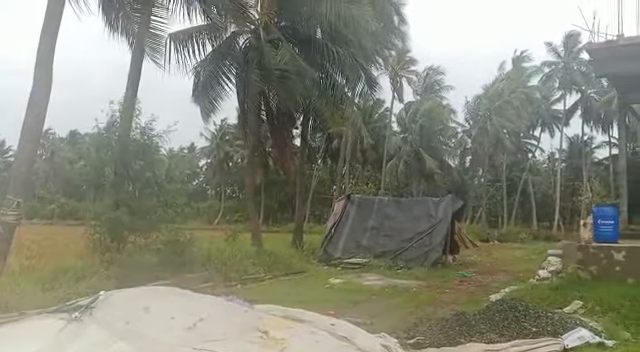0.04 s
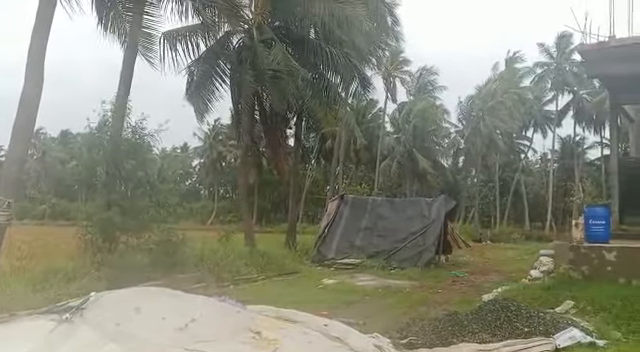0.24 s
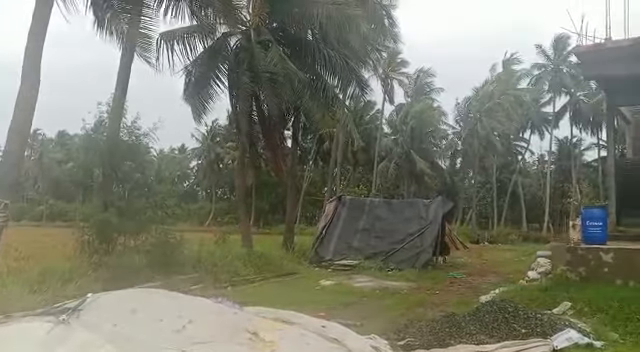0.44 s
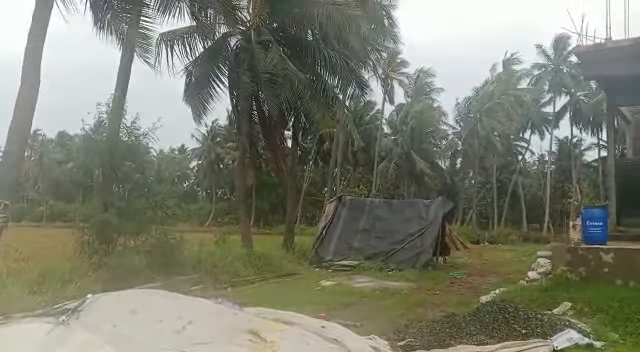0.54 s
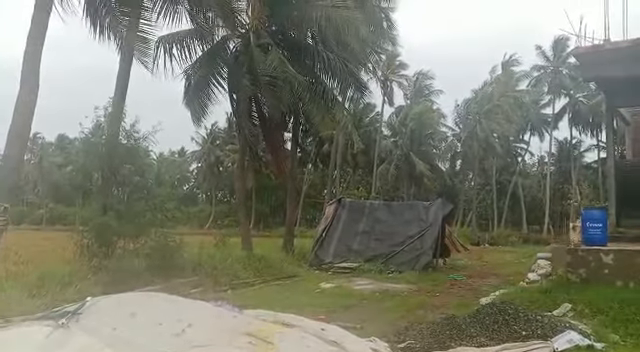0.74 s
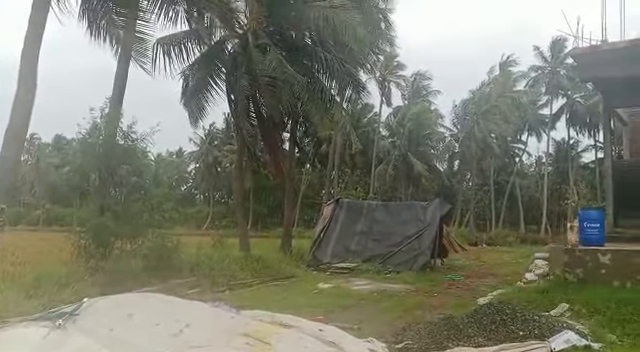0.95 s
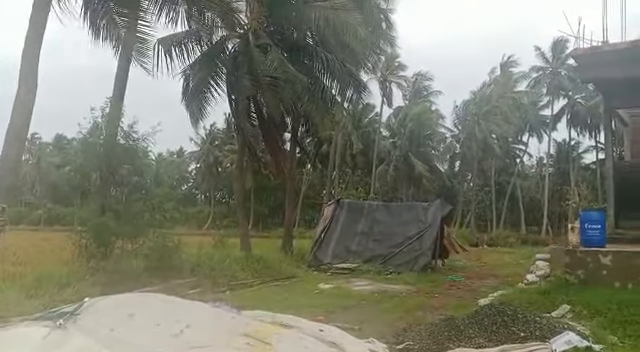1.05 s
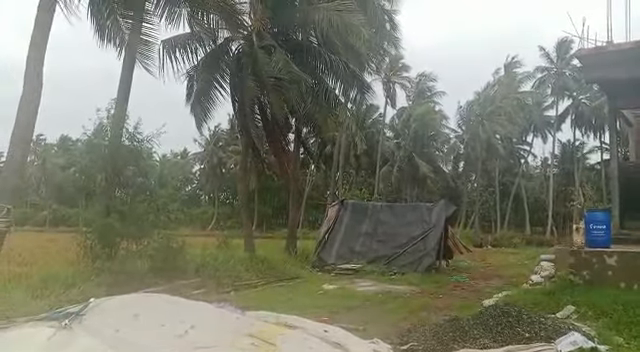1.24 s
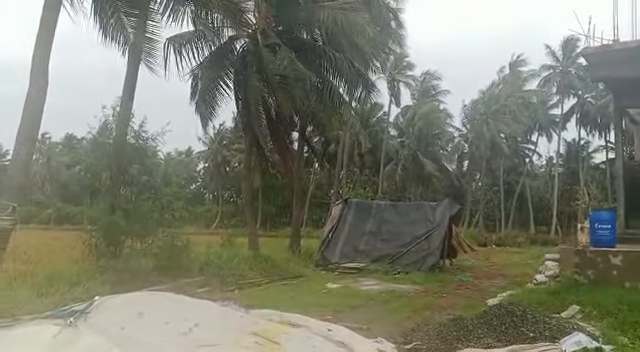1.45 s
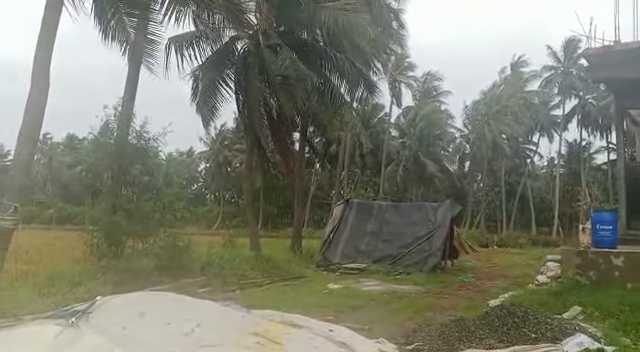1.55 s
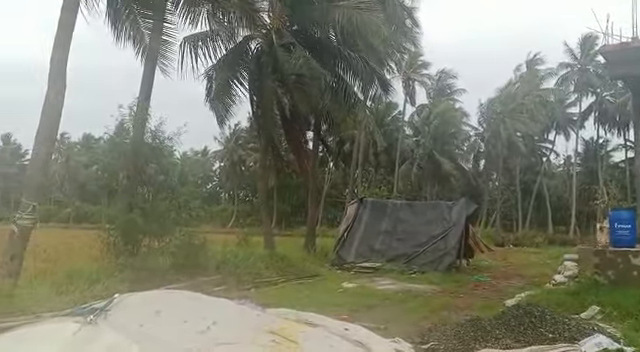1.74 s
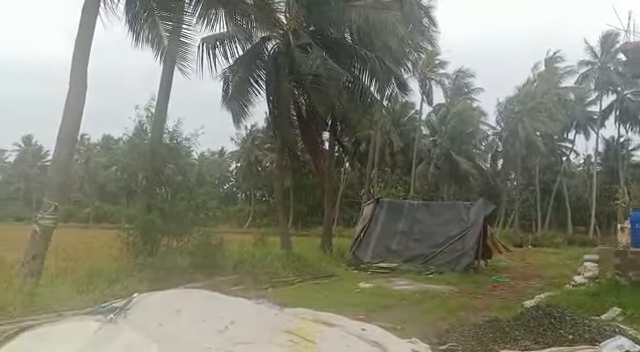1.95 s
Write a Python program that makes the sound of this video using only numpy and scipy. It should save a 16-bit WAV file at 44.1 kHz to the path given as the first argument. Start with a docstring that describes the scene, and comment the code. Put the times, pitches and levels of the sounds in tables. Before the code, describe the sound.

Outdoors by palms, wind blows straight onto a small microphone: an opening gust, a lull with faint rustle, thin tones and soft peeps, then dense fluttering gusts to the end over a weak high insect buzz.

```python
"""Gusty wind buffets a small microphone: noise eddies sweep past its port, brighter as air speed rises.
Sudden bursts lift level and speed together; a low noise rumble lies beneath.
Behind: palm fronds rustle as patchy noise bands, insects buzz as pulsed narrow noise, thin tones drone,
short soft tones peep, and a few grains tick on the case as filtered impulses."""
import sys
import numpy as np
from scipy import signal
from scipy.fft import rfft, irfft, next_fast_len
from scipy.io import wavfile
from scipy.ndimage import uniform_filter1d, minimum_filter1d, map_coordinates

SR = 44100
rng = np.random.default_rng(int(sys.argv[2]) if len(sys.argv) > 2 else 0)


def unload_wav(signal):
    """Save mono or channel-first audio to the path in sys.argv[1] as 16-bit WAV at rate SR, clipped to [-1, 1]."""
    wavfile.write(
        sys.argv[1],
        SR,
        np.round(np.clip(np.atleast_2d(signal).T, -1, 1) * 32767).astype(np.int16),
    )


def gain_from_db(level_db):
    """Convert decibel levels to linear amplitude factors (20 dB per decade)."""
    decades = np.asarray(level_db, float) / 20
    return 10 ** decades


N = 88596
TIME_S = np.arange(N) / SR


def unit(x):
    """Scale to rms 1."""
    return x / np.sqrt(np.mean(x ** 2, -1, keepdims=True) + 1e-20)


def along(points, hz):
    """Interpolate (f/Hz, value) points on a log-frequency axis."""
    f, value = np.transpose(points)
    return np.interp(np.log(hz + 1), np.log(f + 1), value)


def curves(rows):
    """One per-sample curve for each column after the time."""
    s, *columns = np.transpose(rows)
    return [np.interp(TIME_S, s, column) for column in columns]


def wobble(knots_per_s):
    """Smooth random curve through normal knots."""
    knots = rng.standard_normal(N // 40)
    return map_coordinates(knots, [np.arange(N) * knots_per_s / SR])


def filtered(x, response):
    """Apply a zero-phase frequency response."""
    size = next_fast_len(N + 8192)
    spectrum = rfft(x, size) * response(np.fft.rfftfreq(size, 1 / SR))
    return irfft(spectrum, size)[..., :N]


def rush(spectrum, patchy_db, wide_bins, long_frames):
    """Shaped noise of rms 1 with random gain patches in time and frequency."""
    z = signal.stft(rng.standard_normal(N), nperseg=256)[2]
    field = uniform_filter1d(rng.standard_normal(z.shape), wide_bins, 0)
    field = uniform_filter1d(field, long_frames, 1)
    patchy = signal.istft(z * gain_from_db(patchy_db * field / field.std()), nperseg=256)[1][:N]
    return unit(filtered(patchy, lambda hz: gain_from_db(along(spectrum, hz))))


def even(x, span_s):
    """Noise of rms 1 with chance swells slower than the span partly levelled."""
    share = 0.4
    size = max(round(span_s * SR), 2)
    power = np.abs(uniform_filter1d(uniform_filter1d(unit(x) ** 2, size), size))
    return unit(x / (power + 0.01) ** (share / 2))


# strongest bursts of pressure and air speed: t/s, strength/dB (mapped to a jump below)
STRONG_BURSTS = [(0.019, -17), (0.034, -14), (0.05, -8), (0.055, -16), (0.079, -13), (0.092, -16),
                 (0.098, -14), (0.186, -31.5), (0.203, -31.5), (0.255, -30.5), (0.337, -33.5),
                 (0.376, -31.5), (0.414, -20.5), (0.439, -27), (0.513, -29), (0.529, -27.5), (0.583, -25.5),
                 (0.603, -23.5), (0.697, -25.5), (0.706, -18), (0.722, -20.5), (0.738, -26.5), (0.834, -33),
                 (0.846, -25), (0.87, -26), (0.921, -24), (0.939, -20), (0.959, -14), (0.978, -13.5),
                 (0.994, -19.5), (1.014, -14), (1.029, -13.5), (1.042, -15), (1.051, -12), (1.093, -19.5),
                 (1.103, -17.5), (1.137, -13), (1.157, -14), (1.21, -14), (1.223, -11.5), (1.288, -10),
                 (1.296, -7), (1.329, -16), (1.335, -10), (1.356, -15.5), (1.449, -15.5), (1.477, -19),
                 (1.498, -17.5), (1.535, -14.5), (1.543, -16.5), (1.558, -12), (1.57, -19.5), (1.595, -15),
                 (1.619, -6.5), (1.632, -10.5), (1.661, -13.5), (1.672, -11), (1.682, -14.5),
                 (1.693, -11.5), (1.708, -16), (1.734, -12.5), (1.741, -16), (1.773, -15), (1.815, -13),
                 (1.828, -19), (1.892, -21), (1.908, -14.5), (1.954, -19), (1.968, -15.5), (1.983, -16.5)]
JUMP_DB_PER_DB, SOFTEST_DB = 0.33, -42  # jump per dB of strength over the softest
SMALL_BURSTS_PER_S, SMALL_MEAN_DB = 80, 2.5
RISE_S, SETTLE_S = 0.0011, 0.0022  # time constants


def bursts():
    """Level jumps in dB: fast rise, exponential settling, running average removed."""
    sizes_db = SMALL_MEAN_DB * rng.exponential(size=N)
    jumps_db = sizes_db * (rng.random(N) < SMALL_BURSTS_PER_S / SR)
    for s, db in STRONG_BURSTS:
        jumps_db[round(s * SR)] += JUMP_DB_PER_DB * max(db - SOFTEST_DB, 0)
    t = np.arange(SR // 20) / SR
    shape = np.exp(-t / SETTLE_S) * (1 - np.exp(-t / RISE_S)) ** 3
    swing_db = signal.fftconvolve(jumps_db, shape / shape.max())[:N]
    return swing_db - uniform_filter1d(swing_db, size=1100)


# wind ahead of bursts and second port pass: t/s, level/dB, air speed/(m/s)
GUST = [(0.007, -24.5, 5), (0.026, -15.5, 7), (0.044, -22, 9.1), (0.055, -15.5, 7.4), (0.074, -34, 8.2),
        (0.083, -16.5, 7.2), (0.099, -19, 7.1), (0.131, -32.5, 5.3), (0.147, -33, 3.5), (0.171, -34.5, 4.3),
        (0.179, -27.5, 6), (0.193, -29.5, 2), (0.202, -18.5, 4.45), (0.235, -36.5, 3.9), (0.253, -20, 4.7),
        (0.258, -32.5, 4.3), (0.274, -29, 5.6), (0.286, -34.5, 4.1), (0.312, -40.5, 4.2), (0.324, -35, 4.4),
        (0.334, -14, 2.4), (0.344, -29, 4.5), (0.35, -27, 5.3), (0.357, -38.5, 4), (0.369, -27, 3.6),
        (0.382, -22.5, 5.2), (0.392, -24, 2.6), (0.401, -33.5, 3.7), (0.418, -19.5, 5.8), (0.427, -28, 6),
        (0.441, -20.5, 4.74), (0.453, -37.5, 4), (0.492, -31, 3), (0.504, -47, 3), (0.515, -20.5, 2.4),
        (0.522, -30.5, 3), (0.533, -23, 6.27), (0.541, -28, 4.4), (0.551, -25.5, 4.5), (0.566, -34.5, 3.5),
        (0.605, -20.5, 5.46), (0.63, -29.5, 5.7), (0.639, -46.5, 4.9), (0.655, -35.5, 2.6),
        (0.666, -47.5, 1.2), (0.688, -40, 2.6), (0.705, -18, 5.4), (0.717, -25.5, 6.5), (0.727, -17, 4.6),
        (0.746, -24.5, 6.65), (0.768, -18, 3.9), (0.782, -28, 4), (0.789, -25, 6), (0.8, -29, 3.1),
        (0.807, -32.5, 4.3), (0.836, -20.5, 3.1), (0.843, -24.5, 4.7), (0.865, -23, 5.5), (0.879, -20, 4.1),
        (0.89, -23.5, 5.2), (0.903, -23, 5.8), (0.932, -28.5, 6.4), (0.94, -24.5, 5.6), (0.951, -29.5, 5.7),
        (0.961, -19.5, 3.7), (0.969, -20, 7.5), (0.978, -16, 7.34), (1.004, -25.5, 6.1), (1.017, -18, 5.65),
        (1.038, -23.5, 7.9), (1.045, -17, 7), (1.081, -23, 5.5), (1.09, -16, 7.2), (1.097, -30.5, 6),
        (1.109, -11.5, 6.44), (1.128, -26.5, 5.9), (1.138, -19, 5.7), (1.145, -29.5, 7.2),
        (1.157, -17.5, 6.16), (1.184, -26.5, 4.8), (1.193, -21.5, 6.1), (1.21, -20.5, 8.7),
        (1.226, -18.5, 9.2), (1.25, -35, 7.5), (1.26, -20, 7.5), (1.277, -26.5, 6.3), (1.296, -17.5, 9.5),
        (1.321, -22, 6.7), (1.337, -19.5, 8.2), (1.358, -17, 8.7), (1.378, -23, 8), (1.403, -34, 5.7),
        (1.437, -24, 5.7), (1.445, -16.5, 8.3), (1.454, -28, 8.0), (1.463, -23, 6.7), (1.477, -24.5, 7.3),
        (1.496, -17.5, 6.74), (1.518, -24.5, 4.9), (1.535, -20.5, 6.8), (1.546, -16.5, 6),
        (1.554, -24.5, 9.3), (1.583, -21, 4.5), (1.589, -23, 5), (1.598, -14, 7.6), (1.606, -19, 9.2),
        (1.613, -23, 8.5), (1.62, -15, 8.2), (1.628, -22.5, 9.9), (1.636, -15.5, 7.4), (1.643, -27, 5.4),
        (1.649, -28, 9.2), (1.654, -33, 6.4), (1.663, -18.5, 10), (1.67, -22.5, 11), (1.676, -19.5, 10.5),
        (1.683, -20, 11.9), (1.694, -15, 8.3), (1.717, -20.5, 7.7), (1.744, -16, 9.3), (1.765, -25.5, 8.2),
        (1.775, -19, 10.15), (1.801, -22.5, 6.4), (1.833, -18, 10.5), (1.845, -22, 7.2), (1.878, -27.5, 5),
        (1.895, -19, 7.75), (1.948, -25.5, 5.1), (1.964, -19.5, 7.2), (1.975, -28.5, 8),
        (1.985, -20.5, 9.94), (2.003, -22.5, 8.2)]
# port response, half its dB applied in each of two passes: f/Hz, level/dB
PORT = [(60, -70), (110, -31.5), (150, -8.5), (200, 0.5), (260, -2), (3000, 1.56), (4500, -17),
        (7000, -58.5)]
EDGE_HZ, EDGE_DROP_DB, STEEPNESS = 1761, 18, 1.738  # drop reached at the edge at 10 m/s
TILT_DB_PER_OCTAVE = -0.2
SIZE_SPREAD_DB, SIZE_KNOTS_PER_S = 2.5, 260
LOG_SPEED_PER_DB = 0.0168  # natural log of speed gained per dB of burst


def buffet():
    """Eddies of uneven size pass the port; their spectrum stretches upward with air speed."""
    level_db, speed = curves(GUST)
    jump_db = bursts()
    eddies = rng.standard_normal(N) * gain_from_db(SIZE_SPREAD_DB * wobble(SIZE_KNOTS_PER_S))
    bank_speeds = np.geomspace(1.5, 15, num=18)

    def half_port(hz):
        return gain_from_db(along(PORT, hz) / 2)

    def speed_spectra(hz):
        tilt_db = TILT_DB_PER_OCTAVE * np.log2(hz / 200 + 0.1)
        scaled_hz = hz * 10 / bank_speeds[:, None]
        return half_port(hz) * gain_from_db(tilt_db - EDGE_DROP_DB * (scaled_hz / EDGE_HZ) ** STEEPNESS)

    bank = even(filtered(eddies, speed_spectra), span_s=0.0068)
    log_speed = np.log(speed) + LOG_SPEED_PER_DB * jump_db
    place = np.interp(log_speed, np.log(bank_speeds), np.arange(len(bank_speeds)))
    passing = map_coordinates(bank, [place, np.arange(N)], order=1)  # crossfade along the bank
    return filtered(gain_from_db(level_db + jump_db) * passing, half_port)


# large slow eddies: t/s, level/dB
RUMBLE_LEVEL = [(0.02, -18), (0.07, -21.5), (0.112, -25.5), (0.146, -38), (0.196, -28), (0.322, -39),
                (0.41, -24), (0.52, -35.5), (0.532, -25), (0.67, -35.5), (0.714, -24.5), (0.808, -35.5),
                (0.83, -26.5), (0.896, -28.5), (0.918, -24.5), (1.0, -22.5), (1.288, -22.5), (1.426, -34.5),
                (1.452, -24.5), (1.52, -32), (1.552, -22), (1.662, -30), (1.684, -26), (2.0, -28)]
# their relative spectrum: f/Hz, level/(dB per Hz)
RUMBLE_SPECTRUM = [(10, -62), (25, -33), (40, -26), (62, -11), (100, -3.5), (140, -2), (170, -4.5),
                   (230, -15), (330, -44.5), (500, -120)]


def rumble():
    """Large slow eddies: low noise, its chance swells partly levelled."""
    deep = rush(RUMBLE_SPECTRUM, patchy_db=1.0, wide_bins=2, long_frames=5)
    return gain_from_db(curves(RUMBLE_LEVEL)[0]) * even(deep, span_s=0.012)


# far frond rush, relative spectrum: f/Hz, level/(dB per Hz)
FROND_SPECTRUM = [(300, -7.5), (700, -9), (1350, -4.5), (1700, -14.5), (2200, -11.5), (2700, -23),
                  (3300, -13.5), (3900, -23.5), (5000, -44.5), (5200, -120)]
START_DB, FADE_DB_PER_S = -63, 2.5
# leaf tips, relative spectrum: f/Hz, level/(dB per Hz)
TIP_SPECTRUM = [(4000, -120), (4500, -22), (5800, -12), (6800, 1), (8200, 2), (9200, -6), (11000, -9.5),
                (11600, -120)]
# leaf-tip rustle: t/s, level/dB (before trim)
TIP_LEVEL = [(0.02, -76), (0.27, -71.5), (0.282, -74), (0.324, -65.5), (0.346, -72), (0.358, -70.5),
             (0.424, -71), (0.532, -65), (0.576, -75.5), (0.63, -64), (0.724, -74), (1.188, -75),
             (1.6, -78.5), (1.98, -82.5)]
# highest leaf fizz, relative spectrum: f/Hz, level/(dB per Hz)
FIZZ_SPECTRUM = [(11000, -120), (11300, -3.5), (12200, 0.6), (13200, -1), (13800, -15), (15700, -11.5)]
# leaf fizz: t/s, level/dB (before trim)
FIZZ_LEVEL = [(0.02, -82.5), (0.36, -83.5), (0.49, -76), (0.6, -82.5), (0.695, -76), (0.74, -83.5),
              (1.42, -85), (1.5, -75.5), (1.56, -88), (1.98, -89.5)]
TIP_TRIM_DB, FIZZ_TRIM_DB = 0.7, 1.0


def fronds():
    """Patchy noise in three bands: a fading far rush, leaf-tip rustle and a thin fizz above."""
    far = gain_from_db(START_DB - FADE_DB_PER_S * TIME_S) * rush(FROND_SPECTRUM, 3.7, wide_bins=1, long_frames=14)
    tips = gain_from_db(curves(TIP_LEVEL)[0] + TIP_TRIM_DB) * rush(TIP_SPECTRUM, 5.6, wide_bins=4, long_frames=6)
    fizz = gain_from_db(curves(FIZZ_LEVEL)[0] + FIZZ_TRIM_DB) * rush(FIZZ_SPECTRUM, 6, wide_bins=10, long_frames=3)
    return far + tips + fizz


# insect chorus, before random wobble and pulsing: t/s, level/dB
CHORUS_LEVEL = [(0.02, -59.5), (0.884, -56), (0.962, -58), (1.282, -56.5), (1.784, -64), (1.812, -62),
                (2.0, -64.5)]
# its relative spectrum: f/Hz, level/(dB per Hz)
BUZZ_SPECTRUM = [(5410, -46.5), (9200, -22.5), (9350, -14.5), (9650, -0.5), (10000, 5.5), (10500, -1.5),
                 (11400, -19), (14800, -42.5), (22000, -120)]
STROKE_RATE_HZ, PULSE_DEPTH = 190, 0.31  # mean rate


def insects():
    """Narrow noise band pulsing at a slightly wavering stroke rate."""
    turns = np.cumsum(STROKE_RATE_HZ * (1 + 0.025 * wobble(6.8))) / SR
    pulse = 1 + PULSE_DEPTH * np.sin(2 * np.pi * turns)
    level = gain_from_db(curves(CHORUS_LEVEL)[0] + 0.7 * wobble(13))
    return level * pulse * rush(BUZZ_SPECTRUM, patchy_db=0.7, wide_bins=3, long_frames=9)


# faint far tones, relative to the common level: f/Hz, level/dB
DRONE_TONES = [(770, 3), (1125, 3.5), (1292, -0.5), (1505, -7), (2045, -16.5)]
# common level: t/s, level/dB
DRONE_LEVEL = [(0.1, -65.5), (0.2, -61), (0.44, -59.5), (0.48, -75), (0.6, -66), (0.68, -64), (0.8, -71.5),
               (1.3, -80.5)]


def drone():
    """Thin sines wavering in pitch, each swelling on its own."""
    tones = np.zeros(N)
    for hz, db in DRONE_TONES:
        swell = gain_from_db(db + 6.7 * wobble(16))
        turns = hz * TIME_S + np.cumsum(12 * wobble(22)) / SR  # 12 Hz waver scale
        tones += swell * np.sin(2 * np.pi * turns)
    return gain_from_db(curves(DRONE_LEVEL)[0]) * tones


# faint far whistles, before shared wavering: t/s, length/s (between 1/e points), f/Hz, level/dB
PEEPS = [(0.257, 0.039, 3200, -64), (0.302, .045, 3250, -66.5), (.445, 0.041, 3230, -66),
         (0.692, .012, 3200, -67), (0.965, .015, 3200, -68.5)]


def peeps():
    """Short Gaussian-swelled sines, unsteady in pitch and size."""
    waver = np.cumsum(70 * wobble(460)) / SR  # 70 Hz waver scale
    rough = gain_from_db(5.7 * wobble(200))
    tones = np.zeros(N)
    for s, length_s, hz, db in PEEPS:
        swell = gain_from_db(db) * np.exp(-((TIME_S - s) / length_s * 2) ** 2)
        tones += swell * np.sin(2 * np.pi * (hz * TIME_S + waver))
    return rough * tones


# grains on the case: t/s, level/dB (before gain and filter)
GRAINS = [(0.4402, -64), (0.6192, -62.5), (1.3386, -51), (1.598, -56)]
# click response: f/Hz, level/dB
TICK_RESPONSE = [(2000, -11), (5000, -2), (9000, -8), (12500, .1), (15500, -5)]
TICK_GAIN_DB = 16.5


def ticks():
    """Tiny bright clicks: impulses through the click response."""
    impulses = np.zeros(N)
    for s, db in GRAINS:
        impulses[round(s * SR)] = gain_from_db(db + TICK_GAIN_DB)
    return filtered(impulses, lambda hz: gain_from_db(along(TICK_RESPONSE, hz)))


def scene():
    """All sources summed at one microphone."""
    wind = buffet() + rumble()
    behind = fronds() + insects() + ticks() + peeps() + drone()
    return (wind + behind)[None]


def low_pass(x):
    """Removes everything above the highest recorded frequency."""
    return signal.sosfilt(signal.butter(12, 15800, fs=SR, output="sos"), x)


CEILING, HOLD_S = 0.58, 0.004


def record(dry):
    """Look-ahead limiter: gain falls smoothly ahead of peaks over the ceiling."""
    hold = round(HOLD_S * SR)
    needed_gain = np.minimum(1, CEILING / (np.abs(dry) + 1e-9))
    held_gain = minimum_filter1d(needed_gain, 2 * hold + 1)
    limited = dry * uniform_filter1d(uniform_filter1d(held_gain, hold), hold)
    return low_pass(limited)


dry = scene()
out = record(dry)
unload_wav(out)
```